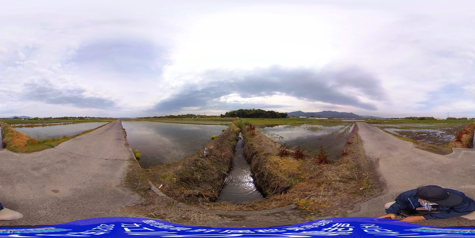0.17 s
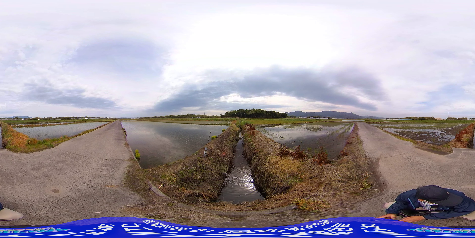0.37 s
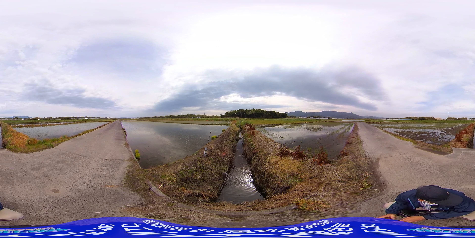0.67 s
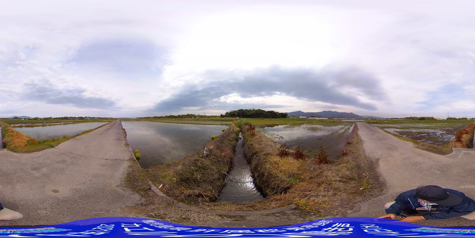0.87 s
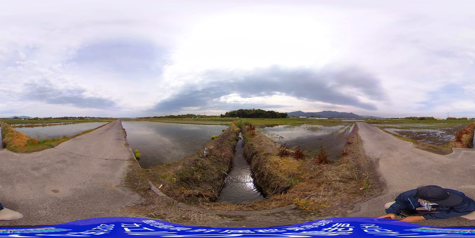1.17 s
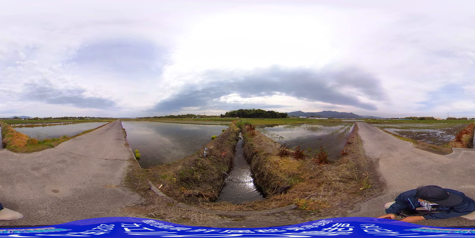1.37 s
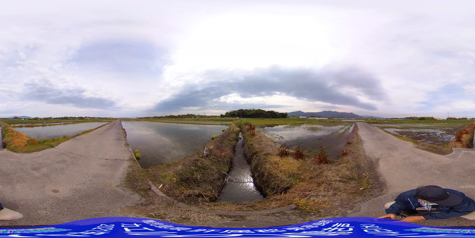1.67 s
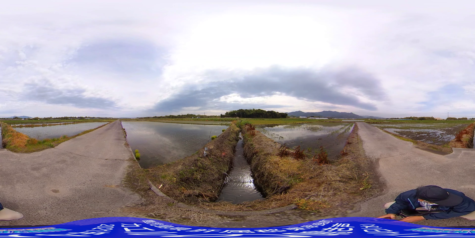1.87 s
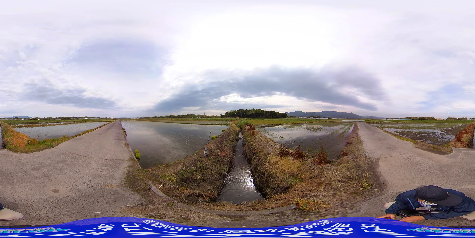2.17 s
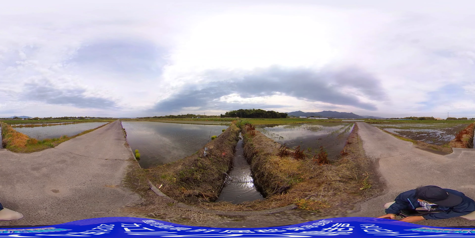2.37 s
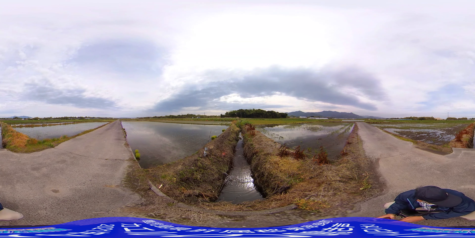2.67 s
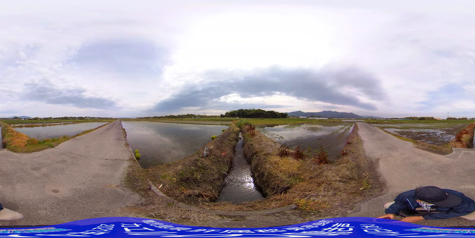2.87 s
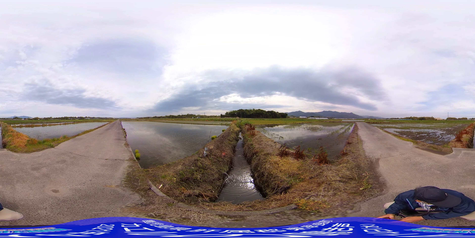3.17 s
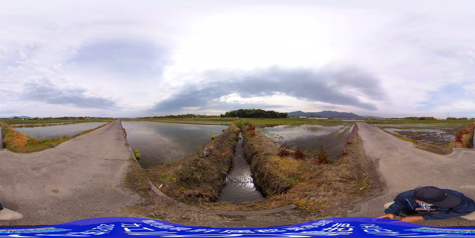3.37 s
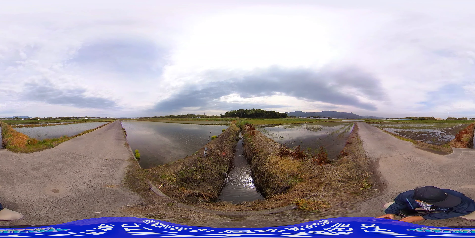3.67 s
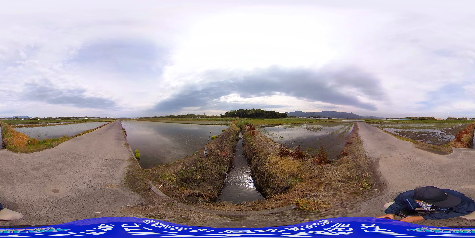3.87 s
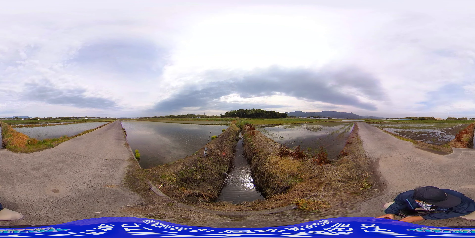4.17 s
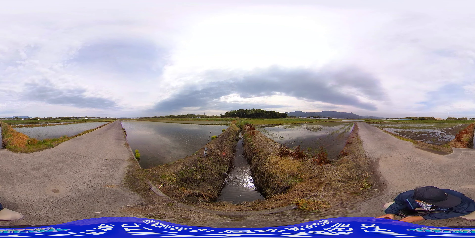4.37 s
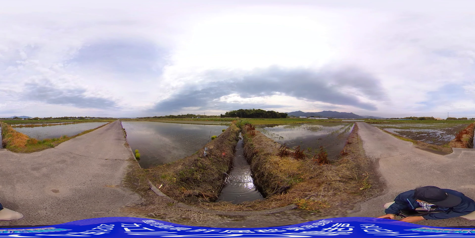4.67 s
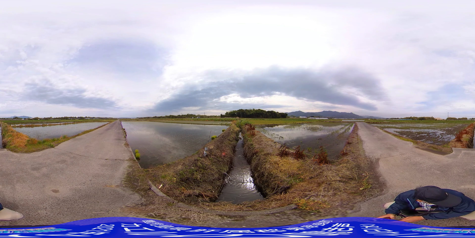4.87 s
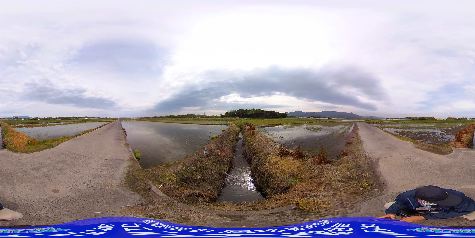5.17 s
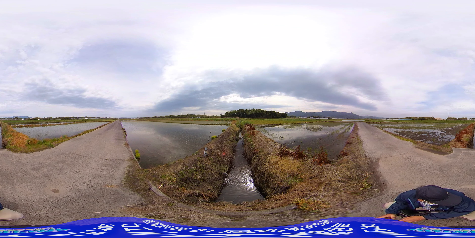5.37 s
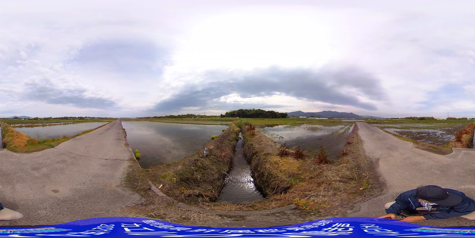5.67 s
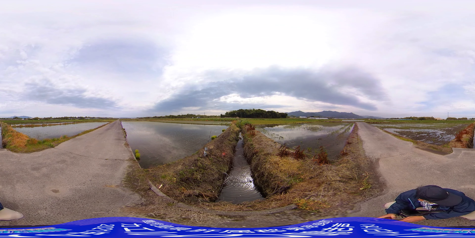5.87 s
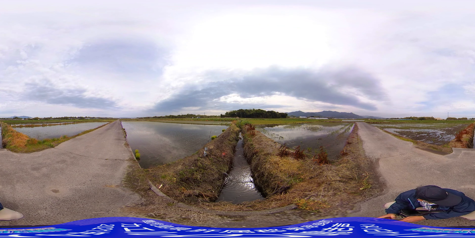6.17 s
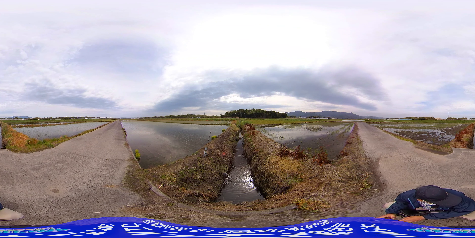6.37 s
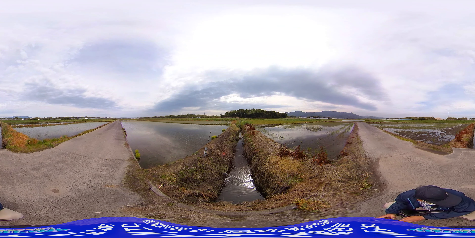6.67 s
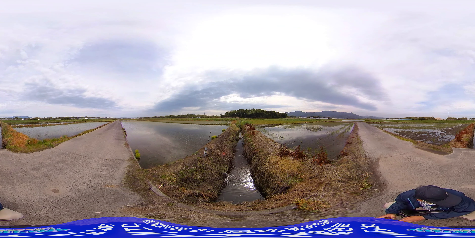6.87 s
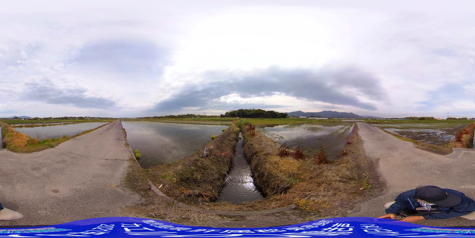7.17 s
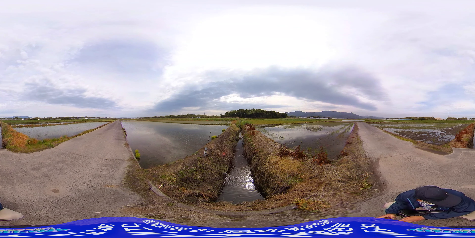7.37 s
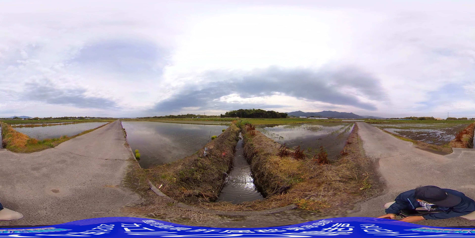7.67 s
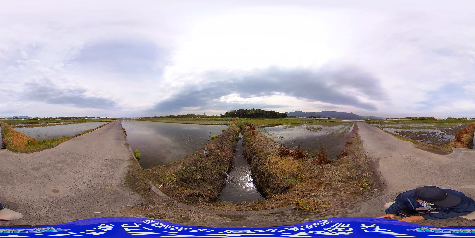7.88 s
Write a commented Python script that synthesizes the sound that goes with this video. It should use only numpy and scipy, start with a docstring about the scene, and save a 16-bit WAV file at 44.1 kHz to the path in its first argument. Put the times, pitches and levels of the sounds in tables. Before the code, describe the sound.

Water rushes and gurgles steadily along a narrow ditch, with small bubbly plinks and faint frogs in the distance.

```python
"""Irrigation ditch with distant frogs

Water rushes along a narrow ditch between flooded rice paddies. Trapped air bubbles ring as damped
oscillators: clouds of them make low gurgles, bright plinks and fine spray that swell and ebb with the
eddies, and single larger bubbles stand out. Far off, frogs chatter and croak through resonant vocal
sacs. The sound fades in over the first two seconds."""
import sys
import numpy as np
from scipy import signal
from scipy.fft import rfft, irfft, next_fast_len
from scipy.io import wavfile
from scipy.ndimage import map_coordinates

SR = 44100
rng = np.random.default_rng(int(sys.argv[2]) if len(sys.argv) > 2 else 0)


def wav_out(sig):
    """Save sig, one row per channel (or a flat mono array), as 16-bit PCM at SR to the path in sys.argv[1]."""
    wavfile.write(sys.argv[1], SR, np.round(np.clip(np.atleast_2d(sig).T, -1, 1) * 32767).astype(np.int16))


N = 353990
TIME = np.arange(N) / SR


def amp(db):
    """Amplitude ratio of a level in decibels."""
    return 10 ** (np.asarray(db) / 20)


def unit(x):
    """Normalisation to an rms of 1."""
    return x / np.sqrt(np.mean(x ** 2) + 1e-20)


def along(points, hz):
    """Interpolation of (frequency [Hz], value) points on a logarithmic frequency axis."""
    freqs, values = np.transpose(points)
    return np.interp(np.log(hz + 1), np.log(freqs + 1), values)


def wobble(rate):
    """Smooth random modulation: a spline through rate knots a second, at rms 1."""
    return unit(map_coordinates(rng.standard_normal(4096), [TIME * rate], mode="wrap"))


def coloured(x, level_db):
    """Minimum-phase filter with the gain level_db(hz); being causal, it keeps attacks sharp."""
    size = 2 * next_fast_len(N // 2 + SR // 8)
    gain = np.maximum(amp(level_db(np.fft.rfftfreq(size, 1 / SR))), 1e-6)
    cepstrum = irfft(np.log(gain), size)
    cepstrum[1:size // 2] *= 2
    cepstrum[size // 2 + 1:] = 0
    return irfft(rfft(x, size) * np.exp(rfft(cepstrum)), size)[..., :N]


def ditch_resonance_db(hz):
    """Cavity resonance: the hollow of the ditch raises the level around each of its modes."""
    # modes of the ditch: (frequency [Hz], width [Hz], boost [dB])
    modes = [(725, 180, 6), (1091, 27, 5.5), (1467, 72, 9.5), (1926, 48, 4.5), (3770, 130, 4)]
    return sum(db / (1 + (2 * (hz - centre) / width) ** 2) for centre, width, db in modes)


def bubble_ring(age, cycles, rise, onset):
    """Damped oscillation of a bubble, rising in pitch; age counts lifetimes, each cycles periods long."""
    envelope = (1 - np.exp(-age * onset)) * np.exp(-age)
    return envelope * np.sin(2 * np.pi * cycles * age * (1 + rise * age))


def bubble_cloud(low_hz, high_hz, cycles, spread_db, wash_db, surge_db, count, samples):
    """Incoherent sum, as (mid, side), of ringing bubbles over the noise wash of countless tiny ones."""
    when, pitch, life, strength, place = rng.random((count, 5)).T
    start = (when * (N - 1)).astype(int)
    hz = low_hz * (high_hz / low_hz) ** pitch
    life_cycles = cycles * 2 ** (2 * life - 1)
    # most bubbles are weak, a few strong; small ones ring briefly but sharply
    gain = amp(-spread_db * np.log(strength + 0.095) + surge_db[start]) * hz / np.sqrt(life_cycles)
    age = np.outer(hz / life_cycles, np.arange(samples) / SR)
    tones = gain[:, None] * bubble_ring(age, life_cycles[:, None], rise=0.022, onset=10.6)
    slots = (start[:, None] + np.arange(samples)).ravel()
    mix = lambda waves: unit(np.bincount(slots, waves.ravel(), N)[:N])
    bubbles = np.array([mix(tones), mix(tones * np.cos(np.pi * place)[:, None])])
    # at wash_db = 0 the wash has the same power per Hz as the bubbles
    wash = unit(rng.standard_normal((2, N)) * amp(surge_db / 2)) * np.sqrt(SR / 2 / (high_hz - low_hz))
    return bubbles + amp(wash_db) * wash


def stream():
    """Air entrainment: folding wavelets trap bubbles of all sizes in bursts; eddies swell each cloud."""
    # slow course of the clouds: (time [s], gurgle level [dB], plink level [dB], spray level [dB])
    flow = [(1.4, -38.5, -38.5, -46.5), (1.9, -38, -37, -45.5), (2.1, -35.5, -31, -44),
            (2.6, -35, -35, -43), (2.9, -38, -36.5, -45.5), (3.05, -34, -32.5, -41.5),
            (3.2, -38, -36.5, -46), (3.5, -35, -33.5, -42), (3.8, -37, -38, -42.5),
            (4.25, -35.5, -34.5, -44), (4.85, -36, -34.5, -43.5), (5.75, -35.5, -36.5, -44.5),
            (6.05, -36, -32, -44.5), (6.2, -35.5, -38, -43), (6.5, -34.5, -33.5, -43),
            (7.7, -35.5, -36.5, -44), (7.85, -33.5, -35, -43), (8.0, -36, -31, -40.5)]
    # spectra of the three clouds and of the foam's fizz: (frequency [Hz], relative level [dB])
    gurgle_spectrum = [(30, -38), (60, -13.5), (110, -6.5), (260, -2.5), (400, -5), (620, -5), (950, -6.5),
                       (1350, -6), (1580, -13), (2000, -26), (3000, -95)]
    plink_spectrum = [(900, -34), (1550, -14), (1750, -0.5), (2200, -0.5), (2450, -7), (3000, -5),
                      (3500, -16), (4500, -22.5), (7000, -73)]
    spray_spectrum = [(2200, -21.5), (3600, -1), (4600, -0.5), (5800, -1.5), (7400, -15.5), (8400, -10),
                      (9700, -3.5), (11500, -11), (13500, -20), (16000, -31)]
    fizz_spectrum = [(2500, -26), (5000, 3.5), (7500, -2), (10000, -3), (13500, -3), (15500, -5)]
    times, *levels = np.transpose(flow)
    gurgle_db, plink_db, spray_db = [np.interp(TIME, times, level) for level in levels]
    eddy_rate = 12  # per second
    shared_eddy_db = 0.57 * wobble(eddy_rate)
    folding = unit(wobble(36) + 2.0 * wobble(130))
    gurgle = bubble_cloud(175.6, 1750, cycles=1.72, spread_db=3.0, wash_db=-3.5,
                          surge_db=1.4 * folding + 0.26 * wobble(45), count=5000, samples=800)
    plink = bubble_cloud(1310, 4090, cycles=3.84, spread_db=3.5, wash_db=-4.5,
                         surge_db=2.1 * folding + 1.44 * wobble(40), count=4000, samples=600)
    spray = bubble_cloud(2760, 11740, cycles=4.1, spread_db=4.0, wash_db=-5.0,
                         surge_db=2.5 * folding + 2.8 * wobble(140), count=13000, samples=280)
    fizz = rng.standard_normal((2, N)) * amp(1.9 * folding)
    water = amp(-51.0) * unit(coloured(fizz, lambda hz: along(fizz_spectrum, hz)))
    for cloud, spectrum, level_db in [(gurgle, gurgle_spectrum, gurgle_db + 0.36),
                                      (plink, plink_spectrum, plink_db - 1.5),
                                      (spray, spray_spectrum, spray_db - 0.5)]:
        swell = amp(level_db + shared_eddy_db + 0.17 * wobble(eddy_rate))
        water += swell * unit(coloured(cloud, lambda hz: along(spectrum, hz) + ditch_resonance_db(hz)))
    return water


def frog_chatter(pitch_hz, width_hz, notes_per_s, level_db):
    """Source and filter: short, slightly uneven rasps excite the vocal-sac resonance of distant frogs."""
    note_phase = np.cumsum(notes_per_s * np.exp(0.14 * wobble(11))) / SR % 1
    envelope = note_phase * np.exp(-note_phase / 0.049)
    # the notes vary in strength, but none stands far above the chorus
    rasp = envelope * rng.standard_normal(N) * amp(1.2 * np.tanh(wobble(10)))
    sac_db = lambda hz: -20 * np.log10(1 + ((hz - pitch_hz) / width_hz) ** 2)
    return amp(level_db) * unit(coloured(rasp, sac_db))


def stray_bubbles(hz, spread_octaves, level_db, cycles, count):
    """Chance bubbles, log-normal in pitch and life, as rows for single_bubbles; long rings start softer."""
    pitch, life, strength = np.clip(rng.standard_normal((count, 3)).T, -2, 2)
    starts = (np.arange(count) + rng.random(count)) / count * N / SR
    life_doublings = 0.66 * life
    levels = level_db + 1.56 * strength - 2.5 * life_doublings
    return list(zip(starts, hz * 2 ** (spread_octaves * pitch), levels, cycles * 2 ** life_doublings))


def single_bubbles():
    """Free oscillation: larger bubbles pinch off with a tiny splash and ring; the banks scatter each tone."""
    # the loudest bubbles: (time [s], frequency [Hz], relative level [dB], lifetime [cycles])
    loud_bubbles = [(1.158, 3760, -20, 2.5), (1.279, 2210, -17, 2.3), (1.294, 715, -23, 2.2),
                    (1.385, 760, -19.5, 1.1), (1.716, 1870, -17, 0.73), (1.924, 2040, -18.5, 5),
                    (2.013, 2190, -14.5, 6.3), (2.083, 2830, -15.5, 2.1), (2.184, 2140, -21, 13),
                    (2.236, 1190, -17, 1.5), (2.347, 2880, -13, 1.1), (2.448, 2380, -15.5, 0.76),
                    (2.59, 1860, -18.5, 6.8), (2.669, 1860, -17, 3.5), (2.699, 9700, -14, 2.5),
                    (2.73, 1834, -25, 13), (2.965, 2175, -10, 4.4), (3.042, 1010, -16.5, 1.3),
                    (3.053, 1190, -20, 1.8), (3.093, 4840, -16, 1.9), (3.113, 2930, -13.5, 2.2),
                    (3.213, 1130, -14, 0.75), (3.232, 2130, -18.5, 4.8), (3.272, 1840, -14, 2.2),
                    (3.41, 9840, -14.5, 2.9), (3.444, 1130, -16, 1.9), (3.56, 4240, -15, 2.3),
                    (3.744, 11100, -15, 1.6), (3.784, 3860, -16, 1.8), (3.916, 10100, -21, 6),
                    (4.004, 2770, -19.5, 4.8), (4.123, 2860, -18, 3), (4.364, 610, -22, 1.1),
                    (4.737, 1020, -23.5, 4.7), (4.782, 4930, -21, 3.5), (4.841, 1930, -16, 4.7),
                    (4.969, 2720, -14, 1.3), (5.221, 2110, -19, 3), (5.272, 716, -19, 1.1),
                    (5.424, 3040, -14, 1.8), (5.452, 6300, -15.5, 1), (5.457, 1360, -24, 0.87),
                    (5.473, 726, -21, 1.9), (5.531, 755, -19.5, 1.7), (5.584, 4300, -12, 1.5),
                    (5.745, 1110, -17, 1.2), (5.847, 730, -17.5, 1), (5.923, 730, -23, 1.6),
                    (5.939, 5720, -19, 6.7), (6.105, 2480, -16, 4.5), (6.123, 2620, -9, 0.91),
                    (6.166, 6670, -16.5, 0.7), (6.443, 2550, -15, 1.3), (6.468, 471, -25, 7.4),
                    (6.474, 690, -16.5, 1.3), (6.691, 2930, -20, 8.7), (6.806, 675, -20.5, 1.6),
                    (7.043, 2140, -14.5, 3.8), (7.204, 2210, -17, 4.6), (7.255, 1830, -19, 3),
                    (7.358, 700, -21, 1), (7.42, 2430, -13.5, 0.97), (7.455, 1970, -19.5, 7.7),
                    (7.642, 1760, -19, 5.9), (7.708, 1740, -19.5, 5), (7.776, 1700, -18, 6),
                    (7.845, 1700, -18.5, 6)]
    # splash of a bursting bubble: (frequency [Hz], relative level [dB])
    splash_spectrum = [(100, -18.5), (600, -2.5), (2200, -0.5), (4000, -12), (6000, -10), (7500, -22),
                       (10000, -15), (14000, -37)]
    glugs = stray_bubbles(853, spread_octaves=0.4, level_db=-24, cycles=2, count=24)
    plinks = stray_bubbles(2050, spread_octaves=0.23, level_db=-21.5, cycles=6.2, count=62)
    ticks = stray_bubbles(7500, spread_octaves=0.48, level_db=-20, cycles=1.7, count=55)
    bank_rise_s, bank_t60_s, splash_t60_s = 0.0038, 0.059, 0.033
    t = np.arange(SR // 25) / SR
    bank_envelope = amp(-60 * t / bank_t60_s) * (1 - np.exp(-t / bank_rise_s))
    rings, splashes = np.zeros((2, 2, N + SR))
    for start, hz, db, cycles in list(loud_bubbles) + glugs + plinks + ticks:
        span = slice(round(start * SR), round(start * SR) + len(t))
        tone = amp(db + 1.5) * bubble_ring(t * hz / cycles, cycles, rise=0.0071, onset=4.0)
        banks = rng.standard_normal((2, len(t))) * bank_envelope
        scatter = signal.fftconvolve(tone[None], banks / np.linalg.norm(banks[0]), axes=1)[:, :len(t)]
        side_gain = rng.uniform(-1.4, 1.46)
        rings[:, span] += np.outer([1, side_gain], tone) + amp(-9.0) * scatter
        # a bubble that bursts early splashes more than one that rings on
        burst = rng.standard_normal((2, len(t))) * amp(-60 * t / splash_t60_s)
        splashes[:, span] += amp(db - 3.0) / np.sqrt(cycles) * burst
    splashes = coloured(splashes[:, :N], lambda hz: along(splash_spectrum, hz))
    return coloured(rings[:, :N] + splashes, ditch_resonance_db)


def frog_calls():
    """Amplitude-modulated pure tones: longer hoots from the paddies swell, waver and die away."""
    # single calls: (time [s], duration [s], frequency [Hz], relative level [dB])
    calls = [(2.545, 0.16, 1800, -38.5), (5.817, 0.15, 272.4, -41), (6.095, .18, 270, -41.5),
             (6.62, 0.16, 274, -44)]
    hoots = np.zeros(N)
    for start, duration, hz, db in calls:
        progress = np.clip((TIME - start) / duration, 0, 1)
        envelope = np.sqrt(np.abs(np.sin(np.pi * progress)))
        hoots += amp(db + 2.5) * envelope * np.sin(2 * np.pi * hz * TIME)
    return hoots * amp(2.5 * wobble(50))


def scene():
    """Mid-side stereophony: the water lies ahead; its bass and its spray spread wide."""
    # stereo image: (frequency [Hz], side gain [dB], leftward lean [-1..1], lag between ears [-1..1])
    image = [(40, 6, 0.077, -.1), (130, -0.5, 0.1, -0.75), (260, -7.5, .2, -0.43), (500, -9.5, 0.28, 0.35),
             (720, -16.5, 0.1, .5), (950, -11, 0.15, .3), (1450, -17, 0.011, 0.13),
             (1700, -13.5, -0.58, 0.2), (2400, -16.5, .15, 0.4), (4770, -16.5, .1, 0.77),
             (6600, -5.5, .65, .1), (7900, 3, 0.22, .7), (10400, -4.5, -0.019, 0.8),
             (12300, 0.5, 0.65, 0.22), (13600, 5.5, -.1, .1), (16000, 1.5, -0.2, 0.24)]
    water, diffuse = stream() + single_bubbles()
    mid = water + frog_chatter(1980, width_hz=340, notes_per_s=13, level_db=-46) + frog_calls()
    hz = np.fft.rfftfreq(N, 1 / SR)
    freqs, *columns = np.transpose(image)
    side_db, lean, lag = [along(np.column_stack([freqs, column]), hz) for column in columns]
    # the side is partly a leaning, phase-shifted copy of the mid and partly unrelated to it
    coherent = (lean - 1j * lag) * rfft(mid)
    incoherent = np.sqrt(np.clip(1 - lean ** 2 - lag ** 2, 0, 1)) * rfft(diffuse)
    side = irfft(amp(side_db) * (coherent + incoherent), N)
    return np.array([mid + side, mid - side])


def record(dry):
    """Band limiting and fade: the microphone's low cut, a power-law fade-in and a sharp treble limit."""
    low_cut_hz, top_hz = 49, 15950
    fade_start_s, fade_length_s = 0.61, 1.43
    low_cut = signal.butter(4, low_cut_hz, "highpass", fs=SR, output="sos")
    fade_in = np.clip((TIME - fade_start_s) / fade_length_s, 0, 1) ** 1.94
    faded = signal.sosfilt(low_cut, dry) * fade_in
    size = next_fast_len(N + SR)
    passband = np.fft.rfftfreq(size, 1 / SR) < top_hz
    return irfft(rfft(faded, size) * passband, size)[:, :N]


dry = scene()
out = record(dry)
wav_out(out)
```